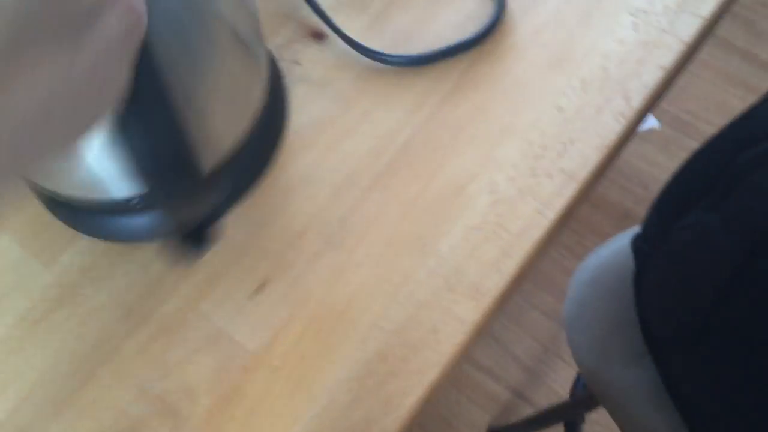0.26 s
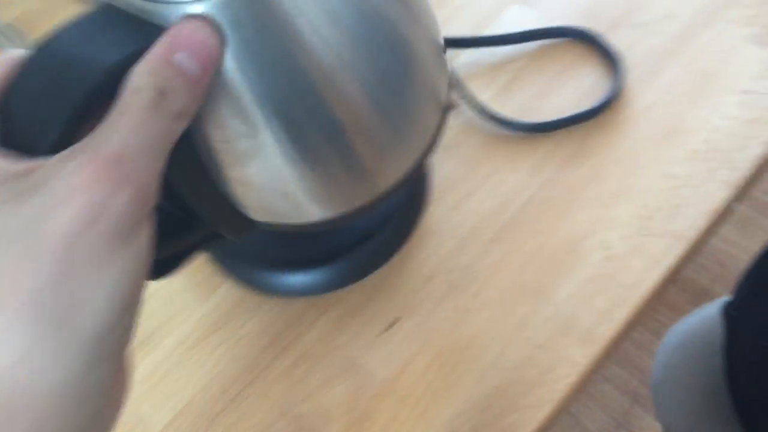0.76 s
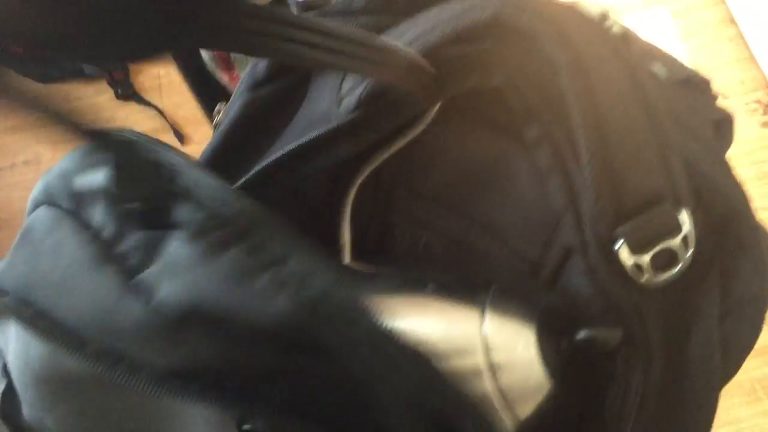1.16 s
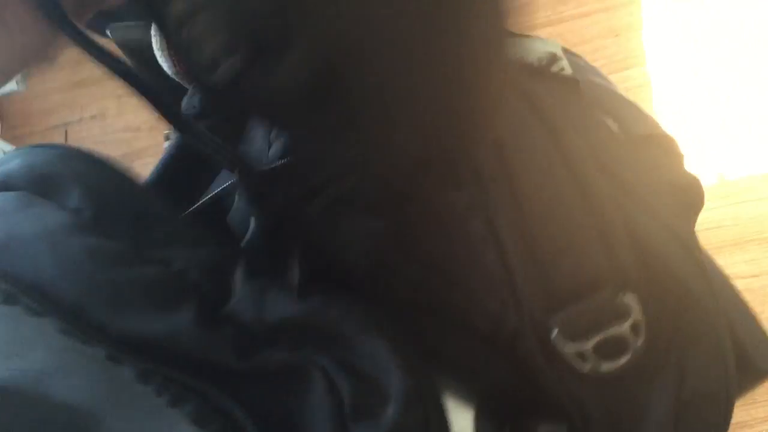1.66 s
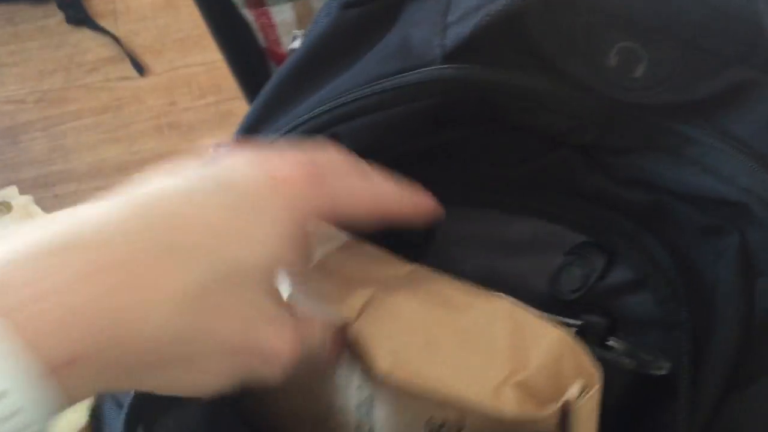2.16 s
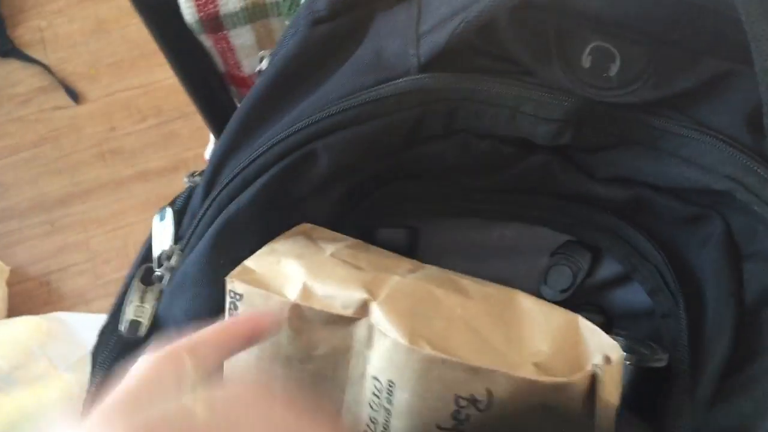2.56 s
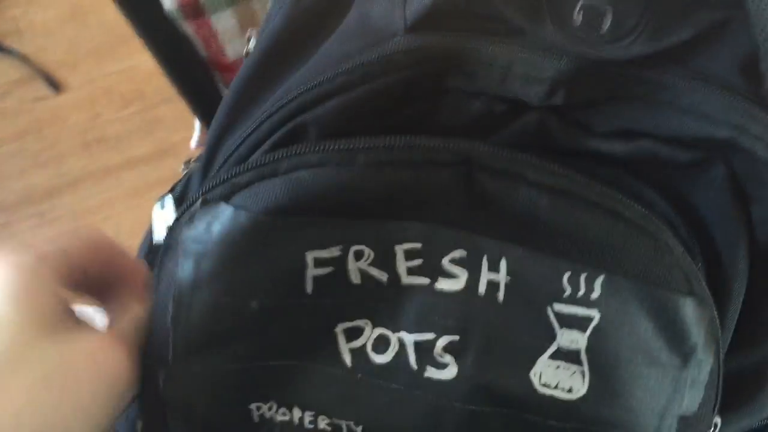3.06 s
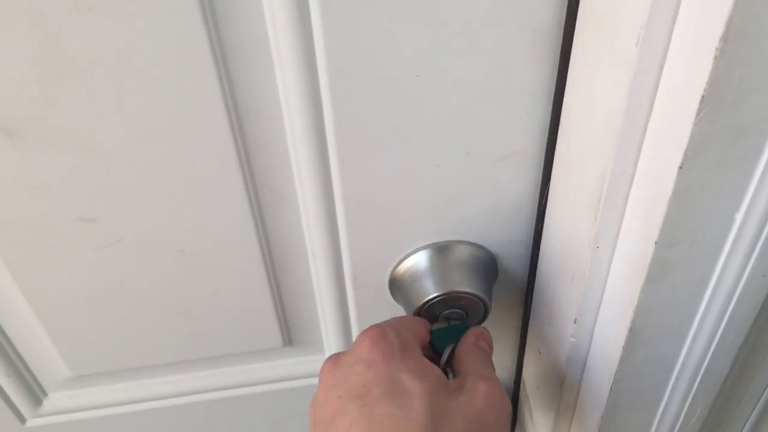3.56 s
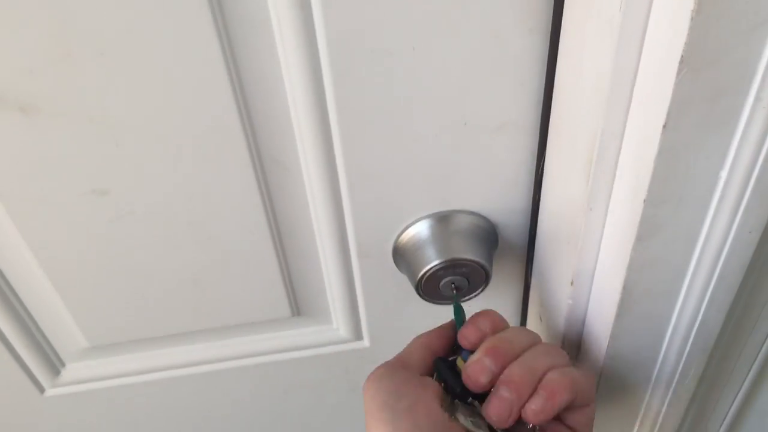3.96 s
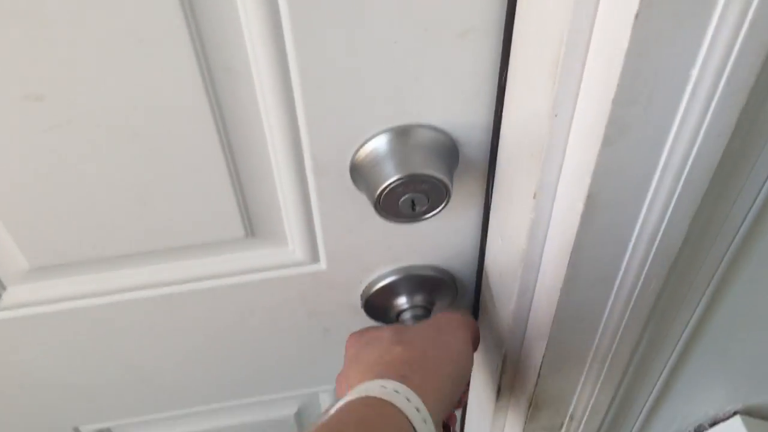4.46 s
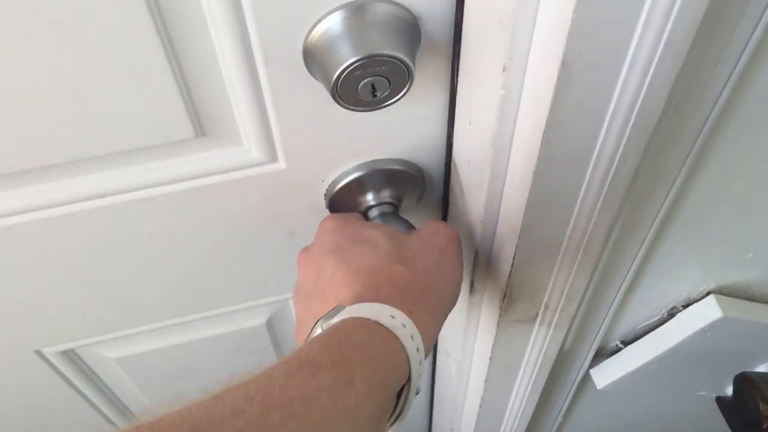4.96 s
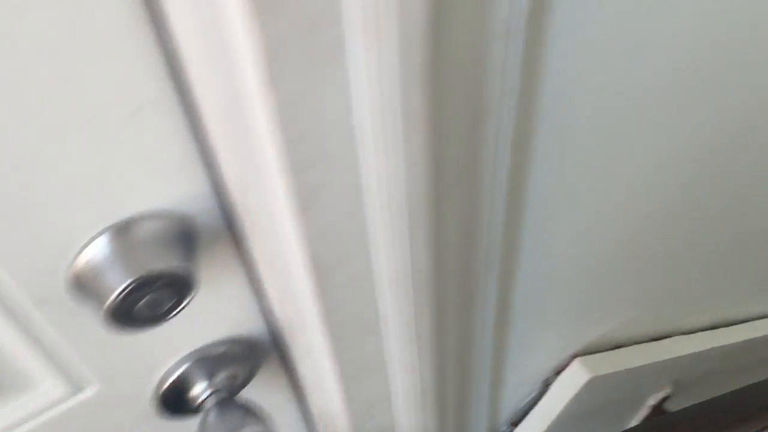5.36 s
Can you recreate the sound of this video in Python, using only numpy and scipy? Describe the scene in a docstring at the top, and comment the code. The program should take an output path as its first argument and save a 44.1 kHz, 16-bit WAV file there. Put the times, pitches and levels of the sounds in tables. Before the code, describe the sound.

Heard close up in a small room at home, a metal kettle clatters against its base. Next come bursts of paper and nylon rubbing, with snapping creases, a very short zip and a ticking zip pull. A key throws a deadbolt with a sharp clack and clicks out of the lock. Keys jingle lightly, the doorknob grates and rattles, and the keys clink again before a low bump.

```python
"""A small room, with things handled close by. A steel kettle knocks and scrapes as it is lifted off its base.
A paper bag is pushed into a backpack: paper and nylon rub, creases snap and a zip runs briefly.
A key throws a deadbolt and slides out over the pins, then the doorknob rattles and the keys clink.
Each knock is a burst of clatter, often with clear ringing notes; each rub is hiss plus many tiny catches.
Under it all the room hums faintly with noise, booms low and gives a short echo."""
import sys
import numpy as np
from scipy import signal
from scipy.io import wavfile
from scipy.ndimage import uniform_filter1d

SR = 44100
rng = np.random.default_rng(int(sys.argv[2]) if len(sys.argv) > 2 else 0)


def transcribe(signal):
    """Save signal, clipped to [-1, 1], as a 16-bit WAV file at the path in sys.argv[1]."""
    frames = np.atleast_2d(signal).T
    limited = np.clip(frames, -1, 1)
    pcm = np.round(limited * 32767).astype(np.int16)
    wavfile.write(sys.argv[1], SR, pcm)


N = 247070


def gain_of(db):
    """Turns decibels into a number to multiply by."""
    return 10 ** (np.asarray(db) / 20)


def unit_level(x):
    """Scales a sound so that its average power is 1."""
    return x / np.sqrt(np.mean(x ** 2) + 1e-20)


def curve_at(points, hz):
    """Reads a curve of (Hz, value) points, joined on a logarithmic pitch scale."""
    point_hz, value = np.transpose(points)
    return np.interp(np.log(hz + 1), np.log(point_hz + 1), value)


def add(mix, start_s, sound):
    """Lays a sound into the mix at its start time."""
    part = mix[max(round(start_s * SR), 0):][:len(sound)]
    part += sound[:len(part)]


def band(x, edges_hz):
    """Keeps the part of a sound between two frequencies."""
    return signal.sosfilt(signal.butter(N=3, Wn=edges_hz, btype="band", fs=SR, output="sos"), x)


def colour(x, tone):
    """Shapes a sound with a curve of (Hz, dB) points, without smearing it earlier in time."""
    hz = abs(np.fft.fftfreq(4096, 1 / SR))
    log_gain = np.log(gain_of(np.maximum(curve_at(tone, hz), -100)))
    response = np.exp(np.conj(signal.hilbert(log_gain)))
    taps = np.fft.ifft(response).real[:2048]
    return signal.fftconvolve(x, taps)[:len(x)]


def dying_noise(decay, size=18000):
    """Countless notes fade together. Decay lists (Hz, fade time): the seconds it takes to drop 60 dB."""
    hz, t, spectrum = signal.stft(rng.standard_normal(size), SR, nperseg=256)
    fade = gain_of(-60 * t / curve_at(decay, hz)[:, None])
    tail = signal.istft(spectrum * fade, SR, nperseg=256)[1][:size]
    return tail / np.linalg.norm(tail)


def strike(blows, tone, notes, decay, tail_db, contact_s, notes_db=0, pitch=1, size=18000):
    """Surfaces chatter as they meet, setting off a clatter and the object's own ringing notes."""
    out, t = np.zeros(N), np.arange(size) / SR
    onset = SR // 50  # levels are set over the first 20 ms
    contact = t / contact_s
    rings = [(hz * pitch, gain_of(db - 60 * t / fade_s)) for hz, db, fade_s in notes]
    hardest_db = max(blow[1] for blow in blows)
    for start_s, level_db, bass_db, treble_db in blows:
        chatter = contact * np.exp(-contact) * rng.standard_normal(size)
        tail = signal.fftconvolve(chatter, dying_noise(decay))[:size]
        clatter = colour(chatter + gain_of(tail_db) * tail, tone)
        sound = clatter / clatter[:onset].std()
        ring_gain = gain_of(notes_db - 0.23 * (hardest_db - level_db))  # lighter blows ring less
        for hz, fade in rings:  # the notes swell while the contact lasts
            sound += ring_gain * (1 - np.exp(-contact)) * fade * np.sin(2 * np.pi * (hz * t + rng.random()))
        parts = [band(sound, edges) for edges in [(40, 300), (300, 5000), (5000, 16000)]]
        bass, middle, treble = (part / part[:onset].std() for part in parts)
        balanced = gain_of(bass_db) * bass + middle + gain_of(treble_db) * treble
        add(out, start_s, gain_of(level_db) * balanced)
    return out


def rub(strokes, tone, attack_s, release_s, catches_per_s, spread_db, hiss):
    """Sliding surfaces hiss and catch on tiny bumps. Each stroke swells, holds, then fades."""
    sizes = gain_of(spread_db * np.minimum(rng.exponential(1, N), 4))
    catches = unit_level(sizes * rng.standard_normal(N) * (rng.random(N) < catches_per_s / SR))
    spectrum = signal.stft(colour(catches + hiss * rng.standard_normal(N), tone))[2]
    flicker = uniform_filter1d(rng.standard_normal(spectrum.shape), size=7, axis=0)
    flicker = unit_level(uniform_filter1d(flicker, size=8, axis=1))
    friction = signal.istft(spectrum * gain_of(2 * flicker))[1][:N]  # the tone flickers by about 2 dB
    parts = [unit_level(band(friction, edges)) for edges in [(100, 400), (400, 4000), (4000, 16000)]]
    power, t = np.zeros((3, N)), np.arange(SR) / SR
    for start_s, length_s, db, bass_db, treble_db in strokes:
        pressure = np.minimum(t / attack_s, 1) * gain_of(db - 60 * np.maximum(t - length_s, 0) / release_s)
        for band_power, part_db in zip(power, (bass_db, 0, treble_db)):
            add(band_power, start_s, (gain_of(part_db) * pressure) ** 2)
    return (np.sqrt(power) * np.array(parts)).sum(0)


def whistle(glides, width_hz):
    """Threads or teeth pass at a rate set by the hand's speed, making a fuzzy, gliding whistle."""
    out = np.zeros(N)
    for start_s, length_s, first_hz, last_hz, db in glides:
        progress = np.arange(0, length_s, 1 / SR) / length_s
        fuzz = unit_level(band(rng.standard_normal(len(progress)), (20, width_hz)))
        hz = first_hz + (last_hz - first_hz) * progress
        note = unit_level(np.sin(2 * np.pi * np.cumsum(hz) / SR))
        swell = np.sqrt(abs(np.sin(np.pi * progress)))
        add(out, start_s, gain_of(db) * swell * fuzz * note)
    return out


# Levels in the tables are relative: a function may turn a whole table up or down.
# Bass and treble are counted from the level in their row.
# The tone of the room's background noise. Each row: frequency in Hz, level in dB.
AIR_TONE = [(25, -19.5), (60, -2), (120, -8.5), (215, -1.5), (420, -18), (600, -22), (1150, -22.5),
            (1500, -26), (2100, -23.5), (4000, -33), (6500, -31), (10000, -38), (16000, -34.5)]


def room_air():
    """The faint, steady noise of a home, joined for a while by a thin, wavering whine."""
    t = np.arange(N) / SR
    air = unit_level(colour(rng.standard_normal(N), AIR_TONE))
    whine = unit_level(band(rng.standard_normal(N), edges_hz=(2910, 2950)))
    return gain_of(-64) * air + gain_of(-75) * whine * ((t > 1.8) & (t < 3.2))


# How long the room echoes. Each row: frequency in Hz, fade time in seconds.
ECHO_FADES = [(100, 0.14), (500, 0.35), (2500, 0.32), (8000, 0.21), (16000, 0.047)]


def room_echo(x):
    """Sound bounces off the walls, comes back after 5 ms and quickly dies away."""
    return signal.fftconvolve(x, np.pad(dying_noise(ECHO_FADES), (SR // 200, 0)))[:N]


def room_boom(x, level_db, fade_s):
    """A low boom builds in the room with the bass of the handling, then dies away."""
    carry_over = gain_of(-120 / (fade_s * SR))
    bass_power = signal.lfilter([1 - carry_over], [1, -carry_over], band(x, (60, 300)) ** 2)
    rumble = unit_level(band(rng.standard_normal(N), edges_hz=(48, 69.4)))
    return gain_of(level_db) * np.sqrt(bass_power) * rumble


# Cloth brushes, then a bump. Each row: start and length in seconds, then level, bass and treble in dB.
BRUSHES_AND_BUMP = [(0, 0.054, -59, 4, -6.5), (1.245, 0.058, -61.5, -8, -8), (5.36, 0.085, -58.5, -26, -8),
                    (5.47, 0.11, -56.5, -18, -16), (5.58, 0.043, -44.5, 2, -22)]
# Their dull tone, shared with the doorknob. Each row: frequency in Hz, level in dB.
DULL_TONE = [(24, -19), (40, -13), (180, -2), (215, -23), (256, -11), (455, -11.5), (630, -5.5),
             (790, -14.5), (1410, -9.5), (1760, -15), (3220, -15), (3830, -23), (16000, -37)]


def clothes_and_bump():
    """Clothes brush softly, and a soft, low bump comes at the end."""
    return rub(BRUSHES_AND_BUMP, DULL_TONE, attack_s=0.02, release_s=0.053,
               catches_per_s=1100, spread_db=7.5, hiss=1.7)


# Pings of metal. Each row: start in seconds, pitch in Hz, level in dB, fade time in seconds.
PINGS = [(2.7935, 14850, -25, .035), (4.1, 4619, -34, .055), (4.2245, 14300, -35, .04),
         (4.311, 8549, -45, .08), (5.412, 8296, -28, .07)]


def metal_pings():
    """The zip pull or a single key springs free and rings on one clear note."""
    out = np.zeros(N)
    for start_s, hz, db, fade_s in PINGS:
        t = np.arange(0, fade_s, 1 / SR)
        add(out, start_s, gain_of(db - 60 * t / fade_s) * np.sin(2 * np.pi * hz * t))
    return out


# Key hits key. Each row: start in seconds, then level, bass and treble in dB, then a pitch multiplier.
CLINKS = [(4.1943, -48, -23, -0.5, 0.8), (4.217, -54, -9, 3, 0.97), (4.2242, -55, -25, 13, 1.03),
          (4.265, -51, -25, -1.5, 1), (4.309, -52.5, -36, 11.5, 2), (4.339, -60.5, -11, 4.5, 1.2),
          (5.266, -69, 1, 15, 0.8), (5.333, -63, -10, 2.5, 1.1), (5.4029, -46, -23, 3, 0.69),
          (5.4116, -46, -14, 8, 1)]
# A key's notes. Each row: pitch in Hz before that multiplier, level in dB, fade time in seconds.
KEY_NOTES = [(2336, -24, .08), (4350, -18, .04), (6700, -14, .05), (8296, -10, .05), (9000, -18, .05),
             (12950, -10, .04), (14230, -7, .045)]
# The tone of a clink. Each row: frequency in Hz, level in dB.
CLINK_TONE = [(60, 0), (900, -20), (2300, -6), (4200, -1), (5200, -5), (7000, -1), (8400, 0), (10500, -9),
              (13500, 0), (16000, -5)]


def keys():
    """Keys of different sizes swing against each other."""
    decay = [(150, 0.072), (3000, 0.14), (12000, 0.12)]
    clinks = sum(strike([blow], CLINK_TONE, KEY_NOTES, decay, tail_db=-5, contact_s=0.00084,
                        notes_db=12.5, pitch=pitch) for *blow, pitch in CLINKS)
    return gain_of(-3) * clinks


# Knocks of the latch. Each row: start in seconds, then level, bass and treble in dB.
LATCH_RATTLES = [(4.496, -44, -12, -6), (4.504, -39, -24, -2), (4.561, -37, -11, -3),
                 (4.626, -40.5, -9, -17), (4.6304, -47, -5, -1.5), (4.696, -39, -2, -14),
                 (4.712, -35, -5.5, -3.5), (4.734, -36, -9, -6.5), (4.8215, -40, -9, -31),
                 (4.8285, -41, 3, -17), (4.85, -34, -20, -5.5), (4.858, -41, -21, -2), (4.9287, -64, 13, 9),
                 (4.9512, -51.5, 4, -13), (4.977, -44.5, 1.5, -6), (4.9861, -38.5, -16, -1.5),
                 (5.016, -44.5, -1, -10), (5.084, -43, -12, -17), (5.123, -43, -15, -20),
                 (5.174, -55.5, 6, -9), (5.228, -50.5, -22, -15)]
# The notes of the knob and door. Each row: pitch in Hz, level in dB, fade time in seconds.
KNOB_NOTES = [(64.6, -2.5, 0.55), (142.2, -7, 0.66), (183.6, -1.5, 0.51), (259.6, 3.5, 0.2),
              (331, -7, 0.17), (620, -13, 0.16), (1425, -6, 0.18), (3190, -40, .08)]
# Turns of the knob. Each row: start and length in seconds, then level, bass and treble in dB.
KNOB_STROKES = [(4.425, 0.063, -59, 12.5, -7.5), (4.495, 0.079, -40.5, -2, -7), (4.62, 0.075, -49.5, 7, -8),
                (4.685, 0.02, -38.5, -4, 1.5), (4.82, 0.046, -37, 7, -11), (4.95, 0.06, -40, -3, -10),
                (5.03, 0.17, -56.5, 4, -9.5), (5.19, 0.1, -73.5, 2, 10)]


def doorknob():
    """The knob's shaft grates as it turns, and the latch rattles in the hollow door."""
    rattles = strike(LATCH_RATTLES, DULL_TONE, KNOB_NOTES, tail_db=-3, contact_s=0.0012, notes_db=-3.5,
                     decay=[(150, 0.085), (1500, 0.1), (5000, 0.06), (14000, 0.011)])
    grating = rub(KNOB_STROKES, DULL_TONE, attack_s=0.012, release_s=0.15,
                  catches_per_s=780, spread_db=1.5, hiss=0.74)
    return gain_of(-1) * rattles + gain_of(-5.5) * grating


# The tone of the bag and its zip. Each row: frequency in Hz, level in dB.
RUSTLE_TONE = [(24, -38), (40, -9.5), (147, -6), (180, -3.5), (529, -9.5), (1180, -6.5), (1720, -8),
               (6170, -17), (10400, -19.5), (13400, -20), (16000, -22.5)]
# Rubs of the bag and zip. Each row: start and length in seconds, then level, bass and treble in dB.
BAG_STROKES = [(1.31, 0.041, -45, -6, -9.5), (1.38, 0.085, -48.5, -2, -4), (1.5, 0.15, -47.5, -3.5, -3),
               (1.68, 0.044, -49, -3.5, -4.5), (1.928, 0.13, -35, -10, 1.5), (2.09, 0.098, -46.5, -8, -7.5),
               (2.23, 0.075, -48, -5, 0), (2.35, 0.11, -63.5, 3, -4.5), (2.585, 0.01, -44.5, 2.5, 1.5),
               (2.625, 0.02, -37.5, -3.5, 3.5), (2.685, 0.057, -41, -8.5, -3.5), (2.77, 0.07, -46, 3, -2),
               (2.835, 0.041, -42, -6, -12.5), (2.9, 0.11, -60.5, -2, -14), (3.12, 0.023, -50, -1.5, -2.5),
               (3.2, 0.14, -63, 1, -2), (3.31, 0.085, -50, 6.5, -9)]
ZIP_STROKES = [(1.786, 0.084, -53.5, -6, 10.3)]
# Creases snap and the zip pull gives short, dry ticks; in the second table the pull rings.
# Each row: start in seconds, then level, bass and treble in dB.
BAG_SNAPS_AND_TICKS = [(1.297, -33.5, -10.5, -18), (1.319, -36, -15, -8), (1.525, -44.5, -16, 7.5),
                       (1.786, -58, -16, 22.5), (1.949, -28.5, -18, -16), (1.965, -28, -29, -3),
                       (2.04, -28, -32, -19), (2.053, -25, -4.5, -7), (2.173, -36.5, -26, -19),
                       (2.26, -37.5, -10, -24), (2.429, -47, -4, -14), (2.608, -39.5, -2, -6),
                       (2.699, -29.5, -6.5, -6), (2.848, -35, 0, -28), (2.869, -33, -29, -25),
                       (2.958, -42.5, -9, -15), (3.127, -43.5, -8, 1)]
RINGING_TICKS = [(2.7935, -50.5, -2, 18), (3.0545, -67, 12, 2), (3.138, -55, -13, 11.5)]
# The metal pull's notes. Each row: pitch in Hz, level in dB, fade time in seconds.
PULL_NOTES = [(6260, -15, 0.17), (6260, -6.5, 0.067), (9000, -22, 0.14), (11200, -27, .08),
              (12000, -26, 0.092), (13700, -10, 0.095), (14500, -16, .05)]
# A hand skids over nylon, and the zip's teeth whine as the slider speeds up.
# Each row: start and length in seconds, first and last pitch in Hz, level in dB.
NYLON_GLIDES = [(1.332, 0.015, 2300, 2150, -34.5), (1.605, 0.065, 2600, 2304, -56),
                (2.634, 0.049, 2730, 2256, -30.5)]
ZIP_GLIDES = [(1.786, 0.086, 3500, 4200, -55)]


def backpack():
    """Nylon and paper rub, creases snap, a zip runs briefly and its metal pull ticks."""
    rustle = rub(BAG_STROKES, RUSTLE_TONE, attack_s=0.027, release_s=0.29,
                 catches_per_s=1300, spread_db=1.1, hiss=1)
    zip_rasp = rub(ZIP_STROKES, RUSTLE_TONE, attack_s=0.0036, release_s=0.011,
                   catches_per_s=2200, spread_db=2, hiss=0.7)
    clicks = strike(BAG_SNAPS_AND_TICKS, RUSTLE_TONE, notes=[], tail_db=-5, contact_s=0.00095,
                    decay=[(200, 0.055), (2000, 0.062), (12000, 0.086)])
    pull = strike(RINGING_TICKS, RUSTLE_TONE, PULL_NOTES, tail_db=-7, contact_s=0.00078, notes_db=-1,
                  decay=[(200, 0.23), (3000, 0.057), (12000, 0.085)])
    whistles = gain_of(-7.5) * whistle(NYLON_GLIDES, width_hz=630) + whistle(ZIP_GLIDES, width_hz=160)
    return whistles + gain_of(-2.13) * (rustle + zip_rasp) + gain_of(-8.5) * clicks + gain_of(-2) * pull


# Hits of the bolt and the lock's pins. Each row: start in seconds, then level, bass and treble in dB.
BOLT_HITS = [(3.5803, -25, -18, -5.5), (3.584, -23.5, -30, -12.5)]
PIN_HITS = [(3.5145, -37.5, -29, 1), (3.526, -38.5, -8.5, 2.5), (3.631, -45, -7, -15),
            (3.6685, -48.5, -20, 1.5), (3.7098, -49, -17, -5.5), (3.762, -56, -20, -5),
            (3.825, -43, -14, -17), (3.8355, -32.5, -32, -15.5), (3.9075, -37.5, -14, -19),
            (3.956, -46, -13, -4), (3.966, -29, -17.5, -20), (3.982, -46, 4, -2.5),
            (4.0235, -24, -13.5, -12.5), (4.041, -38.5, 4.5, -3), (4.082, -39, -0.5, -1),
            (4.093, -33, -28, -9), (4.096, -36.5, -20, 1)]
# The notes they set ringing. Each row: pitch in Hz, level in dB, fade time in seconds.
BOLT_NOTES = [(228, 1, 0.14), (279.4, -6, 0.57), (467, 5, 0.092), (603, 2, 0.111), (923, 0.5, 0.31),
              (1060, -12, 0.18), (1430, 6, 0.1), (1528, 2.5, 0.18), (1670, -27, 0.09), (2170, -8, 0.091),
              (3440, -6.5, 0.074), (8950, -11.5, 0.05)]
PIN_NOTES = [(58.3, -23, 0.18), (142, -25, 0.15), (182.2, 6.5, 0.2), (1509, -13, 0.14), (3010, 11.5, 0.038),
             (3010, -11.5, .07), (3430, -14, 0.057)]
# The tone of their clatter. Each row: frequency in Hz, level in dB.
BOLT_CLATTER = [(24, -59), (40, -55.5), (570, -10), (715, -22), (918, -15), (1520, -10.5), (1760, -11),
                (4460, -27.5), (7360, -42.5), (8550, -33.5), (16000, -50)]
PIN_CLATTER = [(50, 6.5), (180, 1), (350, -10), (850, -9.5), (1500, -3.5), (2300, -6.5), (2800, 2.5),
               (3300, 2.5), (3900, -11.5), (4500, -9.5), (6000, -18), (11000, -21.5), (14000, -18.5),
               (16000, -23)]
# The key slides in the lock. Each row: start and length in seconds, then level, bass and treble in dB.
KEY_STROKES = [(3.507, 0.0093, -36, -11, -1), (3.52, 0.055, -45, -6.5, -12), (3.59, 0.038, -59, 7, 5),
               (3.81, 0.063, -53.5, -6, -20), (3.94, 0.049, -46, -4, -10), (4.022, 0.067, -40.5, -1, -5)]


def deadbolt():
    """The bolt shoots home and rings the door; then the key's teeth ride out over the springy pins."""
    bolt = strike(BOLT_HITS, BOLT_CLATTER, BOLT_NOTES, tail_db=31.5, contact_s=0.0013, notes_db=-4,
                  decay=[(200, 0.26), (1500, 0.076), (4000, 0.039), (14000, 0.077)])
    pins = strike(PIN_HITS, PIN_CLATTER, PIN_NOTES, tail_db=1.5, contact_s=0.0005, notes_db=-5.5,
                  decay=[(150, 0.24), (3000, 0.028), (12000, 0.064)])
    scrape = rub(KEY_STROKES, PIN_CLATTER, attack_s=0.0054, release_s=0.17,
                 catches_per_s=1200, spread_db=1.5, hiss=1)
    return gain_of(-2) * bolt + gain_of(-3) * pins + gain_of(1) * scrape


# Hits of the kettle and its base. Each row: start in seconds, then level, bass and treble in dB.
KETTLE_HITS = [(0.069, -21, -15.5, -21.5), (0.179, -26, -32, -31), (0.329, -26.5, -2.5, -19.5),
               (0.361, -39, -9, -14), (0.412, -26.5, -31, -16), (0.4525, -31.5, -14.5, -19),
               (0.468, -28, -10, -9), (0.477, -31, -19, -23), (0.5417, -32.5, -6, -27),
               (0.5497, -32.5, -13, -7.5)]
BASE_HITS = [(0.0755, -30, -15, -24), (0.303, -33.5, -12, -37), (0.3985, -39, -17, -18),
             (0.42, -35.5, -17, -28), (0.477, -28, -20, -20), (0.492, -46, -16, -17),
             (0.514, -30, -13, -19.5), (0.6914, -39.5, -16, -17), (0.7338, -41.5, -14, -28)]
# The tone of their clatter. Each row: frequency in Hz, level in dB.
STEEL_TONE = [(40, -1.5), (100, -16.5), (140, -14.5), (262, -17.5), (433, -8), (556, -14), (751, -14.5),
              (918, -5), (1090, -25.5), (1560, -17.5), (2440, -21), (2800, -27.5), (11000, -46.5),
              (16000, -50.5)]
PLASTIC_TONE = [(40, -11.5), (400, -17), (700, -9), (950, -2.5), (1150, -9), (1600, 2.5), (2400, -1),
                (3000, -12.5), (6000, -26.5), (16000, -35)]
# The kettle's notes. Each row: pitch in Hz, level in dB, fade time in seconds.
KETTLE_NOTES = [(51.9, -11.5, 1), (142.4, -7, 0.57), (210, -6, 0.26), (417, 6.5, 0.088), (444, 5, 0.34),
                (850, -20.5, 0.31), (930, -16, 0.38), (1628, -8, .25), (1677, -18, 0.17),
                (1780, -2.5, 0.11), (2060, -39, .2), (2520, -16, 0.42), (3670, -31, .25)]
# Scrapes on the base. Each row: start and length in seconds, then level, bass and treble in dB.
KETTLE_STROKES = [(0.085, 0.094, -36, -3, -18.5), (0.225, 0.024, -38.5, -18, -12),
                  (0.315, 0.062, -37, 5, -17), (0.41, 0.14, -34, -4, -15), (0.6, 0.085, -42.5, -15, -21)]


def kettle():
    """The steel body knocks and scrapes on its plastic base, whose rim clicks."""
    knocks = strike(KETTLE_HITS, STEEL_TONE, KETTLE_NOTES, tail_db=-4.5, contact_s=0.0014, notes_db=-1,
                    decay=[(150, 0.024), (2000, 0.23), (5000, 0.25), (14000, 0.044)])
    clicks = strike(BASE_HITS, PLASTIC_TONE, notes=[], tail_db=-4, contact_s=0.0014,
                    decay=[(150, 0.056), (2000, 0.25), (14000, 0.058)])
    scrape = rub(KETTLE_STROKES, STEEL_TONE, attack_s=0.0089, release_s=0.53,
                 catches_per_s=600, spread_db=1, hiss=1)
    return gain_of(-0.5) * knocks + gain_of(0.5) * clicks + gain_of(-4) * scrape


def scene():
    """Mixes all the handling with the room's boom, echo and background noise."""
    lift, bag, door = kettle(), backpack(), deadbolt() + doorknob()
    direct = lift + bag + door + keys() + metal_pings() + clothes_and_bump()
    boom = (room_boom(lift, level_db=-8.5, fade_s=0.27)
            + room_boom(bag, level_db=-20.5, fade_s=0.25)
            + room_boom(door, level_db=-9, fade_s=2.2))
    return (direct + boom + gain_of(-18) * room_echo(direct) + room_air())[None]


def record(dry):
    """Cuts away the very highest treble, above 16150 Hz."""
    low_pass = signal.firwin(401, 16150, window=("kaiser", 9), fs=SR)
    return signal.oaconvolve(dry, low_pass[None], "same")


dry = scene()
out = record(dry)
transcribe(out)
```